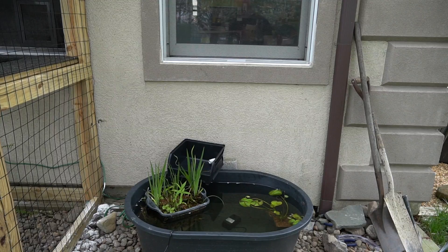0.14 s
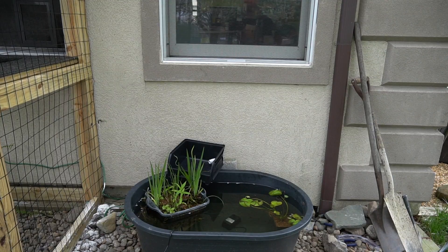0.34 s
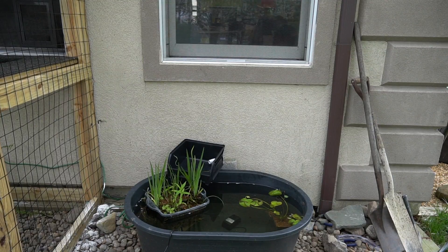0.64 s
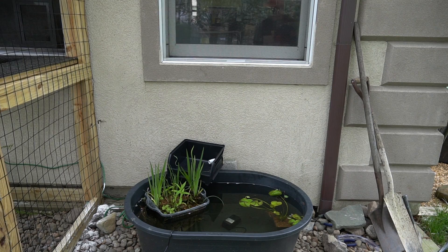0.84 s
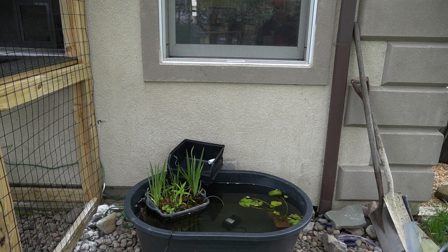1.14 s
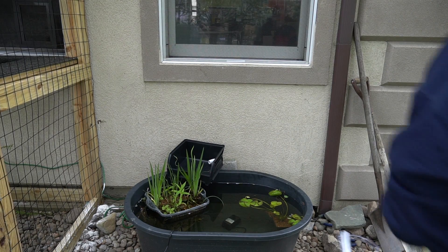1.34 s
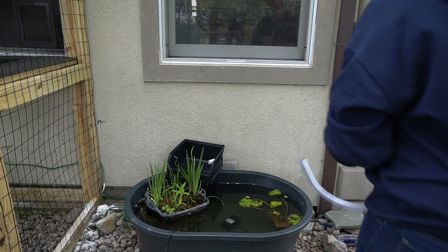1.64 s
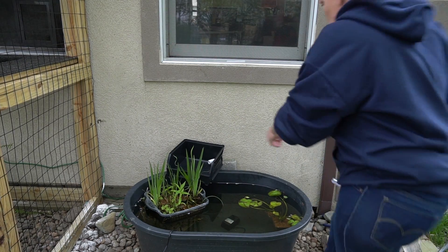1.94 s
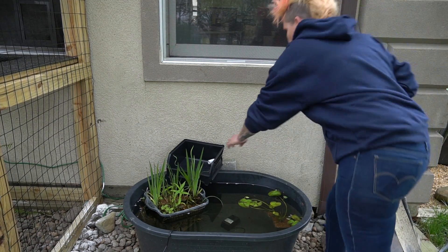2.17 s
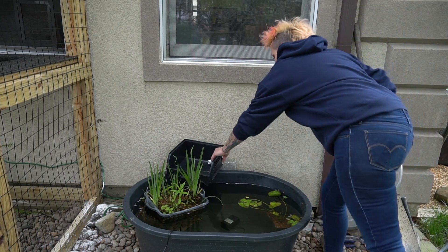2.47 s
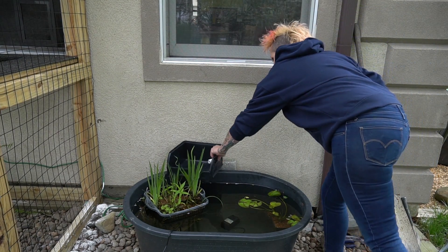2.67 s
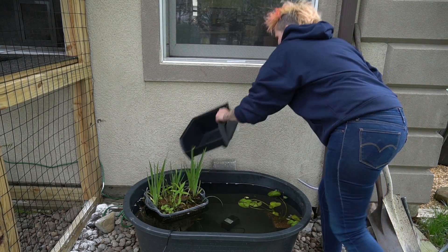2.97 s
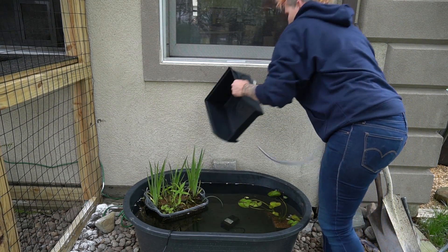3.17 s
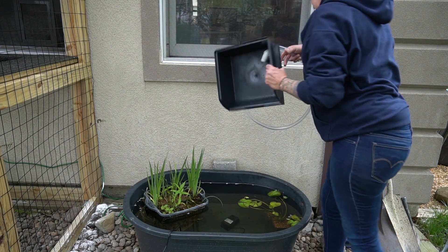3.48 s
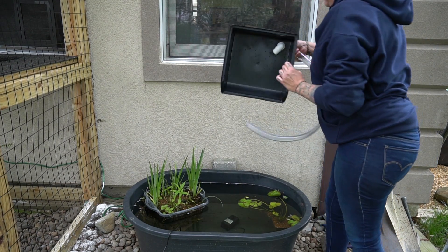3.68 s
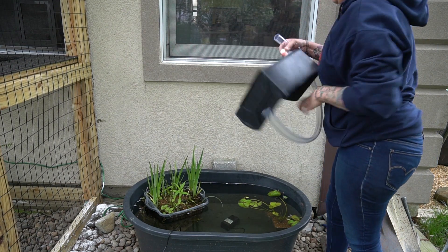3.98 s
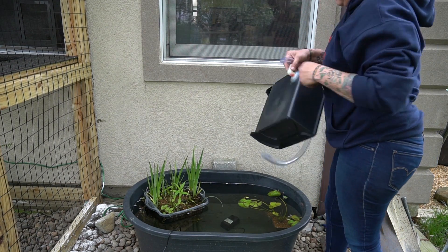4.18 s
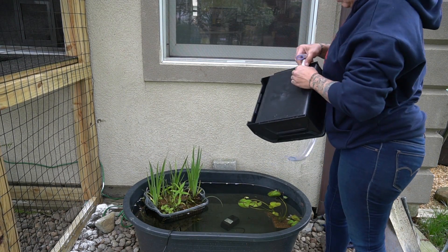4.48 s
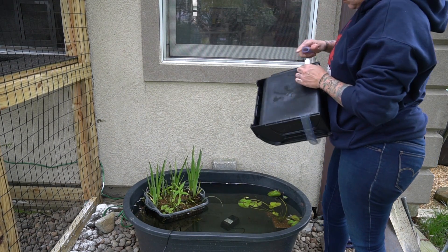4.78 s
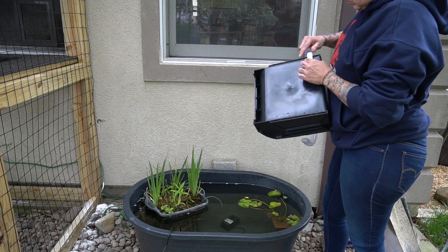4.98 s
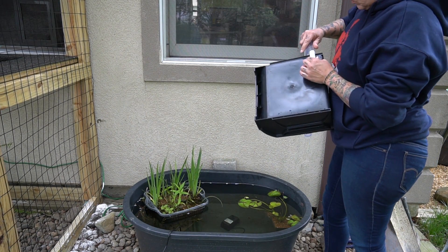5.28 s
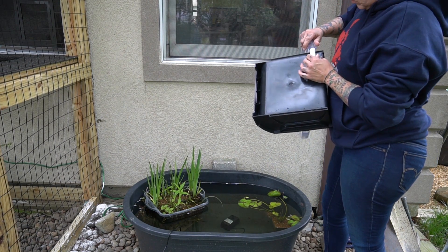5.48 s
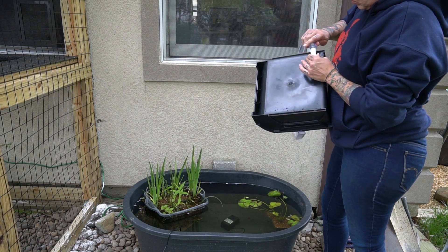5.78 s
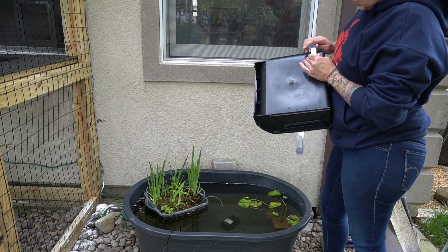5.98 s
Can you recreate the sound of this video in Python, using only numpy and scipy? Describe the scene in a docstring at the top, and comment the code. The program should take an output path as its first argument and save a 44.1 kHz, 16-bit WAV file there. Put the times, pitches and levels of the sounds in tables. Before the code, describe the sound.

Sparrows and other small birds chirp, whistle and sing short falling notes around a backyard, some close and some far off. Soft footsteps crunch on gravel and clothes rustle as someone walks up. About halfway through, a plastic box with tubing is lifted and turned over close to the microphone, giving sharp clicks and hollow knocks. A low, fluttering rumble runs underneath, and a house wall adds short echoes.

```python
"""Back yard birds and a plastic box

Sparrows chirp with both sides of the syrinx while other small birds whistle and slur. Someone walks
up over gravel, lifts a plastic box with its tubing off a pond and turns it over; each impact excites
the modes of the box, so that it knocks and snaps. A low rumble flutters underneath, and reflections
from the house wall and the yard return as short echoes."""
import sys
import numpy as np
from scipy import signal
from scipy.fft import rfft, irfft, next_fast_len
from scipy.io import wavfile
from scipy.ndimage import map_coordinates

SR = 44100
rng = np.random.default_rng(int(sys.argv[2]) if len(sys.argv) > 2 else 0)


def inscribe(sig):
    """Save sig as 16-bit PCM at rate SR to the path in sys.argv[1].

    A 1-D sig is mono; a 2-D sig holds one channel per row.
    Samples are clipped to [-1, 1] before scaling.
    """
    pcm = np.round(np.clip(np.atleast_2d(sig).T, -1, 1) * 32767)
    wavfile.write(sys.argv[1], SR, pcm.astype(np.int16))


N = 269892


# calls: start_s, length_s, level_db, pitch_factor
PEEPS = [(.32, 0.032, -44.5, 0.99), (1.122, 0.026, -47, .98), (2.552, 0.045, -50, 1.01),
         (3.992, 0.036, -46, 1), (5.433, 0.032, -45.5, 1.01), (6.053, 0.037, -46, 1.025)]  # short and arched
CHIPS = [(-.026, 0.076, -46, .98), (.167, 0.086, -46.5, .97), (.371, .071, -45.5, 1),
         (.6, 0.078, -48.5, 1.02), (5.427, .077, -45.5, 1), (5.642, 0.071, -44.5, 1.01),
         (5.861, 0.071, -45.5, 0.98)]  # light sparrow calls
CHIRPS = [(.748, 0.079, -40, 0.99), (4.32, .085, -42.5, 0.97), (6.063, .087, -45.5, 0.98)]  # loud sparrow calls
CHUCKS = [(.545, 0.029, -58, 1), (1.064, 0.036, -48, .99), (1.471, 0.036, -47, 0.98),
          (1.754, .036, -49.5, 0.95), (2.24, 0.04, -48.5, 0.98)]  # soft, hoarse and deeper
# contours of the two sides of the syrinx: note_fraction, pitch_hz, level_db
PEEP_LOW = [(0, 3530, -6), (.2, 3812, -1.5), (.5, 3945, 8), (.85, 3610, -15), (1.1, 3340, -23)]
PEEP_HIGH = [(.1, 6100, -20), (.3, 6330, -4.5), (.8, 6180, 1), (1.101, 6150, -16)]
CHIP_LOW = [(.25, 4254, -18), (.45, 4250, -7), (.65, 4100, -2), (.8, 3745, 4), (.9, 3275, -5.5),
            (1, 2600, -4.5), (1.06, 2400, -56)]
CHIP_HIGH = [(0, 5000, -22), (.15, 6000, -12), (.3, 6490, -1.5), (.55, 6590, -6.5), (.8, 6700, -5),
             (.9, 6500, -26)]
CHIRP_LOW = [(0, 1800, -13), (.15, 2600, -11.5), (.3, 4050, 3), (.45, 4170, 5.5), (.62, 3975, -3.5),
             (.75, 3780, 7), (0.879, 2760, -8), (1, 2010, -6), (1.05, 1798, -10)]
CHIRP_HIGH = [(.05, 4160, -6), (.13, 5300, 5.5), (.24, 6100, .5), (.4, 6400, 0), (.6, 6610, 3),
              (.75, 6850, -34), (.9, 6650, -32)]
CHUCK_LOW = [(0, 1550, -7), (.25, 1760, -2), (.5, 1810, 2), (.8, 1540, -4), (1.1, 1350, -24)]
CHUCK_HIGH = [(0, 2556, 5.5), (.4, 2635, 1), (.8, 2330, -4), (.95, 1720, 18), (1.1, 1400, -20)]

def birds():
    """The direct-to-reverberant ratio falls with distance: far birds carry the most reverberation."""
    peeps = two_voices(PEEPS, PEEP_LOW, PEEP_HIGH, high_db=-8.5, pan_db=8, waver=.015, octave_db=-30)
    chips = two_voices(CHIPS, CHIP_LOW, CHIP_HIGH, high_db=-8, pan_db=3.5, waver=.031, octave_db=-38)
    chirps = two_voices(CHIRPS, CHIRP_LOW, CHIRP_HIGH,
                        high_db=-6.5, pan_db=2.2, waver=.033, octave_db=-13.5)
    chucks = two_voices(CHUCKS, CHUCK_LOW, CHUCK_HIGH,
                        high_db=-14, pan_db=-.5, waver=.02, octave_db=-26)
    falls = slurs(pan_db=10)
    near = house(peeps + chips + chirps, echo_db=-3) + house(falls, echo_db=-11)
    far = whistles(pan_db=-8.5) + rising_notes(pan_db=16) + twitter()
    return (yard(near, wall_db=-14.5, tail_db=-5.5)
            + yard(far, wall_db=-13, tail_db=-1)
            + amp(1.5) * yard(song(pan_db=-.5), wall_db=-11.5, tail_db=-4)
            + yard(chucks, wall_db=-16.5, tail_db=-8))


def two_voices(calls, low, high, high_db, pan_db, waver, octave_db):
    """Biphonation: the two sides of the syrinx vibrate at once, one low and raspy, one high and purer."""
    out = np.zeros((2, N))
    sides = (low, 0, waver, octave_db), (high, high_db, .75 * waver, -40)
    for start, length, call_db, factor in calls:
        u = np.arange(int(length * SR * 9 / 8)) / (length * SR)  # runs past 1 for the release
        for contour, side_db, side_waver, side_octave_db in sides:
            fraction, hz, db = np.transpose(contour)
            swell = amp(call_db + side_db + np.interp(u, fraction, db, left=-90, right=-90))
            pitch = factor * np.interp(u, fraction, hz)
            add(out, start, swell * syrinx(pitch, side_waver, side_octave_db), pan_db)
    return out


def syrinx(pitch, waver, octave_db):
    """Random frequency and amplitude modulation roughen a tone and its weak second harmonic."""
    phase = 2 * np.pi * np.cumsum(pitch * (1 + waver * wobble(351.5, len(pitch)))) / SR
    rasp = 1 + 14 * waver * wobble(1500, len(pitch))
    return unit(rasp * (np.sin(phase) + amp(octave_db) * np.sin(2 * phase)))


def glide(length, first_hz, last_hz, db, sag, waver, flutter_db, warble=0, warble_hz=37, fade_s=.0064):
    """A frequency sweep sags midway; a deepening warble modulates pitch and amplitude together."""
    u = np.linspace(0, 1, int(length * SR))
    pitch = (first_hz + (last_hz - first_hz) * u) * (1 - sag * np.sin(np.pi * u))
    fade = np.sin(np.pi / 2 * np.clip(np.minimum(u, 1 - u) * length / fade_s, 0, 1))
    warble_phase = 2 * np.pi * warble_hz * length * u + wobble(19.66, len(u))
    swing = warble * (.3 + 1.25 * u) * np.sin(warble_phase)
    tone = (1 + 20 * swing) * syrinx(pitch * (1 + swing), waver, octave_db=-28)
    return amp(db + flutter_db * wobble(84.9, len(u))) * fade * tone


# long falling notes of one bird: start_s, length_s, level_db, grace_pitch_hz
SLURS = [(0.714, 0.24, -49, 5300), (1.672, 0.28, -47, 6280), (3.605, 0.23, -47.5, 5250),
         (4.859, .3, -48, 5300)]

def slurs(pan_db, first_hz=3850, last_hz=2552, grace_s=.038):
    """A frequency-modulated downward sweep, opened by a brief grace note in the upper voice."""
    out = np.zeros((2, N))
    for start, length, db, hz in SLURS:
        fall = glide(length, first_hz, last_hz, db, sag=.03, waver=.018, flutter_db=2.2, warble=.04)
        grace = glide(grace_s, hz / 1.03, hz * 1.03, db - 11.5, sag=0, waver=.0047, flutter_db=-4.5)
        add(out, start, fall, pan_db)
        add(out, start, grace, pan_db)
    return out


# notes of a bird straight ahead: start_s, length_s, first_hz, last_hz, level_db
SONG = [(2.355, 0.069, 3250, 2778, -45), (2.428, 0.077, 2495, 2300, -48), (2.935, 0.046, 3040, 3130, -47),
        (2.969, .03, 2714, 2160, -40), (2.991, 0.086, 2544, 2205, -45), (3.468, 0.062, 3330, 2960, -47.5),
        (3.501, 0.044, 2670, 2310, -44.5), (3.521, 0.06, 2840, 2790, -42.5),
        (3.599, 0.049, 2680, 2430, -46), (4.088, 0.069, 3210, 3150, -52), (4.136, 0.041, 2450, 2186, -51),
        (4.195, 0.039, 2640, 2680, -43), (4.4, 0.046, 2290, 2243, -53), (4.433, 0.035, 2678, 2680, -44.5),
        (4.858, .04, 2134, 1937, -51.5), (4.91, 0.043, 2560, 3350, -46.5), (4.946, 0.06, 2590, 2330, -42.5),
        (5.03, 0.057, 2070, 2105, -48.5), (5.18, 0.054, 3540, 3700, -60), (5.493, .05, 3000, 2710, -46),
        (5.558, 0.11, 2900, 2524, -43.5), (5.67, 0.034, 3630, 3450, -42)]

def song(pan_db):
    """Short frequency sweeps, most of them falling, group into phrases."""
    out = np.zeros((2, N))
    for start, *note in SONG:
        add(out, start, glide(*note, sag=.0242, waver=.014, flutter_db=2.5), pan_db)
    return out


# impacts and how hard they excite each part of the box: start_s, floor_db, wall_db, rim_db, snap_db
BLOWS = [(2.7604, -40, -47, -35, -34.5), (3.2886, -38, -30, -17, -31.5), (3.3089, -31, -36, -30, -32),
         (3.533, -31.5, -33.5, -37, -44.5), (3.747, -46.5, -50, -50.5, -49.5),
         (4.0695, -31.5, -39, -44.5, -42.5), (4.7994, -25.5, -32.5, -39, -50), (5.54, -24, -24, -38, -48),
         (5.734, -39.5, -48, -65, -70), (5.748, -42, -52, -50, -63)]
# modes, from the floor and walls up to the stiff rim: frequency_hz, level_db, t60_s
BOX_MODES = [(190.5, -7, 0.21), (334, -3, 0.05), (446, 1.5, 0.062), (541, 1, 0.077), (833, -6.5, 0.068),
             (958, 2, 0.027), (1104, -11, 0.037), (1300, -12.5, 0.052), (1658, -4.5, 0.052),
             (1777, -7.5, 0.054), (1817, -6, 0.045), (1970, -6, 0.042), (2295, 0.5, 0.016),
             (2740, -8, 0.019), (2970, 9.5, 0.0077), (3340, -6, 0.047), (3270, -16.5, 0.17)]
# limits of six bands: edge_hz
BAND_EDGES = [130, 380, 750, 1400, 2150, 4500, 11000]
# spectrum of each part: level_db per band
FLOOR, WALL = [-12, 0.5, -16, -18, -32.5, -39], [-32, -20, -1, -11, -11.5, -37]
RIM, SNAP = [-34, -23, -20, 0.5, -13, -36], [-4.5, -22, -14, -8, 0, -6]

def box(scatter_db=2.5):
    """Modal vibration: each impact rings the same damped modes; the contact point sets the spectrum."""
    out, t = np.zeros((2, N)), np.arange(SR // 4) / SR
    for start, *parts_db in BLOWS:
        gains = np.linalg.norm(amp(parts_db)[:, None] * amp([FLOOR, WALL, RIM, SNAP]), axis=0)
        ring = 0
        for hz, db, t60 in BOX_MODES:
            envelope = amp(db + rng.normal(0, scatter_db)) * decay(t, t60)
            ring += envelope * np.sin(2 * np.pi * hz * t) * rng.choice([-1, 1])
        crack = noise(len(t), width=.81) * (1.6 * decay(t, t60=.008) + 1.06 * decay(t, t60=.092))
        impact = ring * (1 - np.exp(-t / .0017)) + crack
        blow = 0
        for lo, hi, gain in zip(BAND_EDGES, BAND_EDGES[1:], gains):
            part = band(impact, lo, hi)
            onset_rms = np.sqrt(np.mean(part[:, :SR // 50] ** 2))
            blow += gain * part / onset_rms
        add(out, start, blow, pan_db=-.6)
    return out


# taps of stones, tubing and plastic: start_s, level_db, centre_hz, t60_s, pan_db
TICKS = [(1.164, -51, 8000, 0.078, -16), (1.228, -37.5, 420, .083, -2), (1.28, -44, 6950, 0.058, -8),
         (1.294, -41.5, 805, .075, -4), (1.983, -32.5, 3000, 0.044, -6), (1.998, -35, 3450, 0.14, -6),
         (2.052, -40, 880, 0.057, -5), (2.074, -30, 4500, 0.016, -7.5), (2.3604, -44, 6000, .046, -9),
         (2.987, -36, 1870, 0.045, -3), (3.534, -9.5, 3540, 0.0032, 2), (3.7738, -45, 6960, .036, -3),
         (3.903, -40, 1420, 0.083, -4), (5.0716, -37.5, 4550, 0.013, -7)]

def ticks():
    """Heavily damped impacts radiate a burst of band-limited noise with almost no ring."""
    out, t = np.zeros((2, N)), np.arange(SR // 8) / SR
    for start, db, hz, t60, pan_db in TICKS:
        burst = unit(band(noise(len(t), width=.19), hz / 1.7, hz * 1.4, order=2))
        add(out, start, amp(db) * decay(t, t60) * burst, pan_db)
    return out


# steps and handling: start_s, relative_level_db, length_s
THUDS = [(0.368, -44.5, 0.086), (.441, -36.5, 0.064), (0.947, -48.5, 0.16), (1.516, -42, 0.096),
         (1.746, -37, 0.088), (1.88, -43, 0.16), (2.384, -45, .07), (2.76, -32.5, 0.077),
         (2.87, -40.5, 0.12), (3.217, -38.5, .11), (3.625, -41, 0.063), (3.792, -38.5, 0.065),
         (4.322, -39, 0.084), (5.047, -36.5, .05), (5.117, -34.5, .05), (5.54, -36, 0.058),
         (5.794, -35.5, 0.056), (5.92, -39.5, 0.069), (6.036, -33.5, 0.16)]

def thuds(attack_s=.0028, fall_db=18):
    """Soft impacts excite only low frequencies: a few damped cycles within a puff of noise."""
    out = np.zeros((2, N))
    for start, db, length in THUDS:
        t = np.arange(int(2 * length * SR)) / SR
        bump = np.sin(2 * np.pi * rng.uniform(103.5, 143) * t) * decay(t, t60=.05)
        puff = unit(band(noise(len(t), width=.64), 78, 216.5, order=2))
        thud = (bump + puff * amp(-fall_db * t / length)) * (1 - np.exp(-t / attack_s))
        add(out, start, amp(db - 7.5) * unit(thud), pan_db=0)
    return out


# effort of walking up, bending for the box, then standing: time_s, relative_level_db
EFFORT = [(0, -55.5), (.45, -61.5), (.9, -57.5), (1.9, -57), (2.1, -54), (2.55, -56), (2.8, -52),
          (3.3, -52.5), (3.55, -55), (4.1, -54), (4.65, -58), (5.05, -55), (6.12, -58)]
# strokes of friction: start_s, length_s, relative_level_db
SCUFFS = [(1.964, 0.089, -42), (2.84, 0.27, -56), (3.83, 0.12, -50)]  # soles and sleeves
CRUNCHES = [(0.218, 1, -61), (1.147, 0.48, -58), (1.952, 0.4, -55), (2.257, 0.41, -63), (2.716, 0.47, -62),
            (4.039, 0.34, -57.5)]  # feet on gravel
# friction spectra: frequency_hz, density_db
CLOTH = [(200, 8.5), (400, -14.5), (1000, 5.5), (2000, 1.5), (3200, 1.5), (5000, -9), (9000, -32)]
GRAVEL = [(700, -1), (2000, 0), (4500, -2), (7500, 0), (11000, -5)]

def movement(grit_db=-13):
    """Friction noise: clothes rub, soles scuff, and gravel slips in tiny grains under each step."""
    effort_db = curve(EFFORT)
    rubbing = np.hypot(amp(effort_db), strokes(SCUFFS))
    rubbing *= amp(1.7 * wobble(25, N) + 1.2 * wobble(200, N))
    crunching = np.hypot(amp(effort_db + grit_db), strokes(CRUNCHES))
    crunching *= amp(1.5 * wobble(700, N) + 1.2 * wobble(50, N))
    return amp(2.5) * rubbing * rush(CLOTH) + amp(8) * crunching * rush(GRAVEL)


def strokes(rows, rise_fraction=.11):
    """Contact pressure builds quickly and releases slowly in each stroke."""
    t = np.arange(N) / SR
    return sum(amp(db) * np.interp((t - start) / length, [0, rise_fraction, 1], [0, 1, 0])
               for start, length, db in rows)


# strength of the rumble: time_s, relative_level_db
RUMBLE_LEVEL = [(0, -51.5), (1.42, -61.5), (1.78, -47), (2.4, -45), (2.55, -52.5), (3.48, -56.5),
                (3.7, -43), (4.88, -42), (4.98, -51.5), (5.2, -46.5), (5.5, -51), (5.68, -57), (6.12, -41)]
# its spectrum: frequency_hz, density_db
RUMBLE_SPECTRUM = [(15, -50), (25, -34), (75, -4), (119, 2.5), (167, -4.5), (233, -7.5), (436, -20),
                   (545, -20), (592, -36), (700, -21), (910, -78), (1540, -120)]

def rumble():
    """Random amplitude modulation makes low-frequency noise flutter."""
    return amp(curve(RUMBLE_LEVEL) - 1.5 + 2.63 * wobble(30, N)) * rush(RUMBLE_SPECTRUM)


# thin held notes far to the right: start_s, length_s, first_hz, last_hz, level_db
WHISTLES = [(0, 0.24, 6780, 6680, -71), (.37, 0.48, 5490, 5490, -64.5), (.67, 0.2, 5460, 5540, -58.5),
            (1.075, .24, 5340, 5560, -59.5), (1.156, .19, 3400, 3230, -58.5),
            (1.374, 0.097, 5470, 5510, -55), (1.593, 0.38, 4240, 4060, -62.5),
            (2.07, 0.26, 4060, 3996, -57), (2.421, 0.21, 4040, 4010, -56), (2.447, 0.32, 5170, 4740, -67.5),
            (2.451, 0.26, 3400, 3210, -54), (2.795, 0.153, 3995, 3950, -57), (3.065, 0.17, 3952, 4014, -56),
            (3.349, 0.28, 4076, 4050, -63), (3.777, 0.14, 3775, 3830, -52.5)]

def whistles(pan_db):
    """Nearly steady oscillation gives almost pure tones that swell in and die away."""
    out = np.zeros((2, N))
    for start, *note in WHISTLES:
        add(out, start, glide(*note, sag=0, waver=.0075, flutter_db=3, fade_s=.024), pan_db)
    return out


# faint high notes on the left: start_s, length_s, first_hz, level_db
RISES = [(.468, .088, 4800, -62), (2.483, 0.1, 6850, -68), (2.803, 0.047, 5000, -61),
         (5.046, .12, 4680, -60.5), (5.173, 0.06, 6800, -67)]

def rising_notes(pan_db, ratio=1.1):
    """Upward sweeps of equal frequency ratio span the same musical interval."""
    out = np.zeros((2, N))
    for start, length, hz, db in RISES:
        add(out, start, glide(length, hz, hz * ratio, db, sag=.0114, waver=.0066, flutter_db=1), pan_db)
    return out


# distant sparrows: time_s, level_db
FLOCK_LEVEL = [(0, -75), (1.5, -76), (2.6, -62), (3.3, -72), (3.65, -60.5), (4.3, -82), (4.55, -63),
               (5.2, -70), (5.5, -69)]

def twitter(count=500):
    """Incoherent superposition blurs many tiny high glides into a flock."""
    out, u = np.zeros((2, N)), np.linspace(0, 1, SR // 25)
    for when, height, bend, side in rng.random((count, 4)):
        pitch = (4700 + 2400 * height) * (1 + .281 * (bend - .5) * u)
        note = np.sin(np.pi * u) * np.sin(2 * np.pi * np.cumsum(pitch) / SR)
        add(out, when * N / SR, note, pan_db=12 * (side - .5))
    return amp(curve(FLOCK_LEVEL)) * unit(out)


# outdoor air: frequency_hz, density_db
AIR_SPECTRUM = [(25, -38), (80, -4.5), (300, 5), (1000, -6), (1800, -5), (3500, -10.5), (5000, -14),
                (11000, -16)]

def air():
    """Stationary broadband noise forms the ambient floor."""
    return amp(-56.5) * rush(AIR_SPECTRUM)


# lag of the wall reflection, left and right: delay_s
WALL_DELAYS = [.0125, .01256]

def house(x, echo_db):
    """Interference: each glide beats against its own reflection from the house wall."""
    return x + amp(echo_db) * delayed(x, WALL_DELAYS)


# reverberation time of the yard: frequency_hz, t60_s
YARD_DECAY = [(200, 0.069), (900, 0.45), (1700, 0.58), (4000, 0.55), (10000, 0.39)]

def yard(x, wall_db, tail_db):
    """Reverberation: six early reflections on each side lie over an exponentially decaying tail."""
    hz, t, spectrum = signal.stft(rng.standard_normal((2, SR // 2)), SR, nperseg=256)
    tail = signal.istft(spectrum * decay(t, along(YARD_DECAY, hz)[:, None]), SR, nperseg=256)[1]
    response = amp(tail_db) * tail / np.linalg.norm(tail[0])
    for side in response:
        arrivals = (rng.uniform(.004, .035, size=6) * SR).astype(int)
        side[arrivals] += amp(wall_db) * rng.choice([-1, 1], size=6)
    return x + signal.fftconvolve(x, response, axes=1)[:, :N]


# likeness of left and right: frequency_hz, correlation
COHERENCE = [(100, 0.84), (250, 0.63), (1000, 0.44), (2500, 0.31), (5000, 0.049), (10000, 0.13)]

def rush(spectrum):
    """Coloured noise of rms 1, coherent between left and right mainly at long wavelengths."""
    def response(hz):
        angle = np.arccos(np.clip(along(COHERENCE, hz), -1, 1)) / 2
        return amp(along(spectrum, hz)) * [np.cos(angle), np.sin(angle)]
    mid, side = filtered(rng.standard_normal((2, N)), response)
    return unit(np.array([mid + side, mid - side]))


def noise(size, width):
    """Partly correlated white noise: a common part plus an independent one on each side."""
    return rng.standard_normal(size) + width * rng.standard_normal((2, size))


def amp(db):
    """Decibels to amplitude ratio."""
    return 10 ** (np.asarray(db) / 20)


def decay(t, t60):
    """Exponential damping, 60 dB in t60 seconds."""
    return amp(-60 * t / t60)


def unit(x):
    """Normalisation to rms 1."""
    return x / np.sqrt(np.mean(x ** 2) + 1e-20)


def along(points, hz):
    """Interpolation on a logarithmic frequency axis."""
    knots_hz, values = np.transpose(points)
    return np.interp(np.log(hz + 1), np.log(knots_hz + 1), values)


def curve(points):
    """Linear interpolation in time, one value per sample."""
    return np.interp(np.arange(N) / SR, *np.transpose(points))


def wobble(rate, size):
    """Smooth random modulation with rate knots a second."""
    knots = rng.standard_normal(int(size * rate / SR) + 4)
    return map_coordinates(knots, [np.arange(size) * rate / SR])


def filtered(x, response):
    """Filtering multiplies the spectrum by a frequency response."""
    size = next_fast_len(N + SR // 2)
    return irfft(rfft(x, size) * response(np.fft.rfftfreq(size, 1 / SR)), size)[..., :N]


def delayed(x, delay_s):
    """A delay is a phase lag proportional to frequency."""
    return filtered(x, lambda hz: np.exp(-2j * np.pi * np.outer(delay_s, hz)))


def band(x, lo_hz, hi_hz, order=3):
    """Causal band-pass filter."""
    sections = signal.butter(order, [lo_hz, min(hi_hz, SR / 2 - 1)], "band", fs=SR, output="sos")
    return signal.sosfilt(sections, x)


def add(out, start_s, sound, pan_db):
    """A level difference places a sound in the mix; pan_db is left minus right."""
    start = round(start_s * SR)
    part = (sound * amp([[pan_db / 2], [-pan_db / 2]]))[:, max(-start, 0):N - start]
    out[:, max(start, 0):][:, :part.shape[1]] += part


def scene():
    """Superposition of the birds, the knocks with one far echo, the person and the background."""
    knocks = box() + ticks()
    far_echo = delayed(band(knocks, 1140, 3100, order=1), delay_s=.053)
    handling = yard(knocks, wall_db=-32, tail_db=-15)
    handling += amp(-21.5) * yard(far_echo, wall_db=-16, tail_db=-4.5)
    return birds() + handling + rumble() + thuds() + movement() + air()


def record(dry):
    """Band limiting thins the deepest bass and cuts off the highest treble."""
    low_hz, top_hz = 34, 11100
    return filtered(dry, lambda hz: hz ** 4 / (hz ** 4 + low_hz ** 4) / (1 + (hz / top_hz) ** 120))


dry = scene()
out = record(dry)
inscribe(out)
```